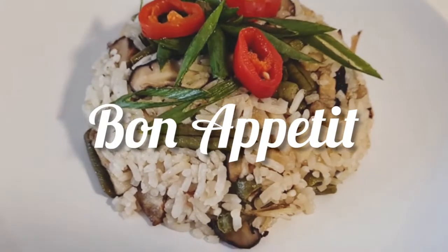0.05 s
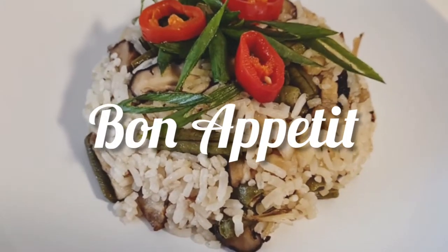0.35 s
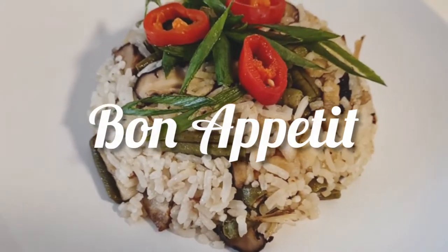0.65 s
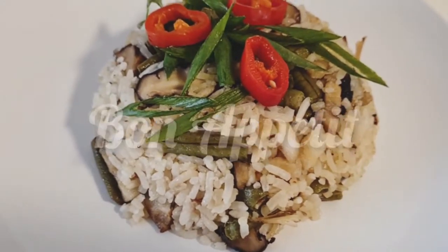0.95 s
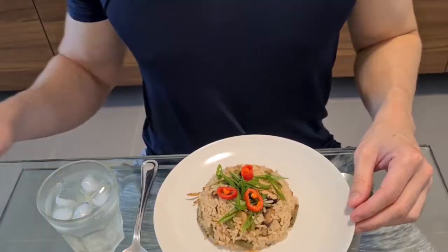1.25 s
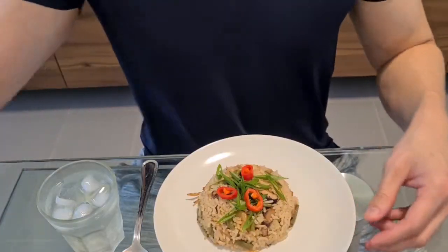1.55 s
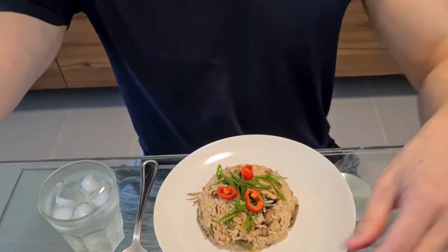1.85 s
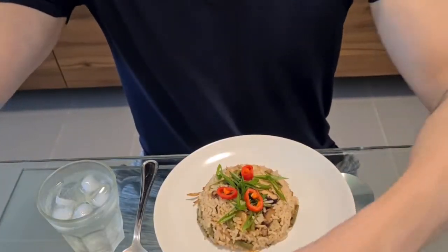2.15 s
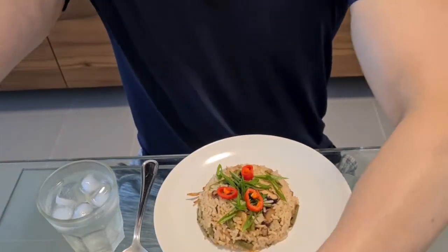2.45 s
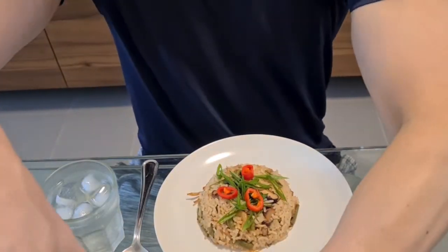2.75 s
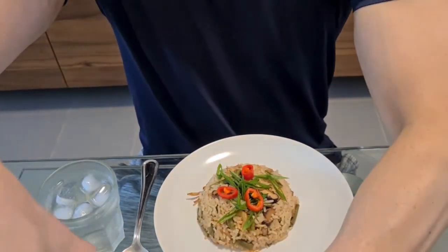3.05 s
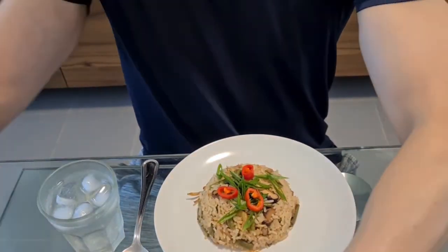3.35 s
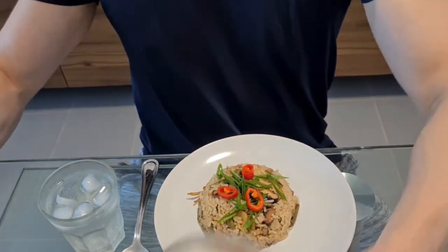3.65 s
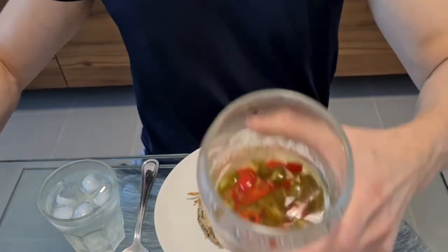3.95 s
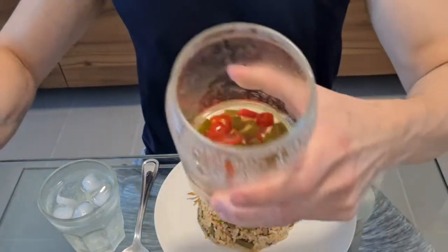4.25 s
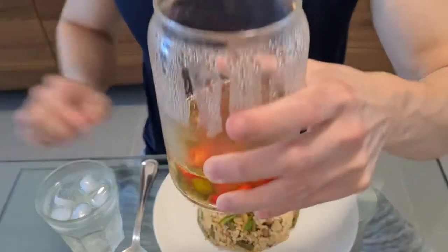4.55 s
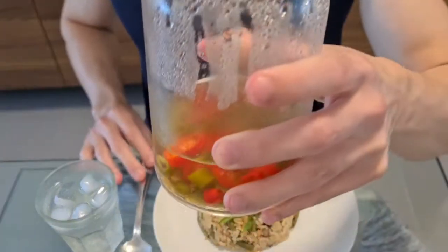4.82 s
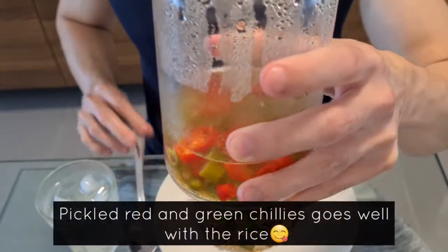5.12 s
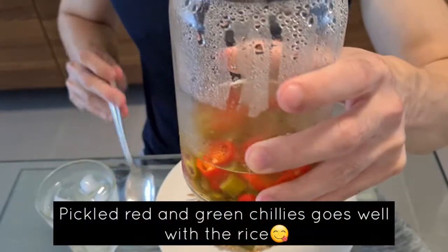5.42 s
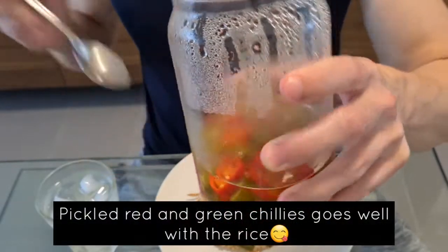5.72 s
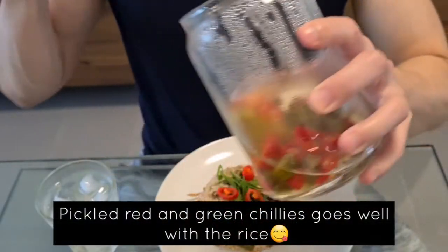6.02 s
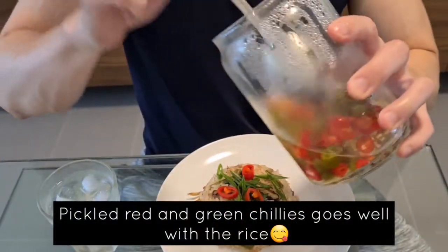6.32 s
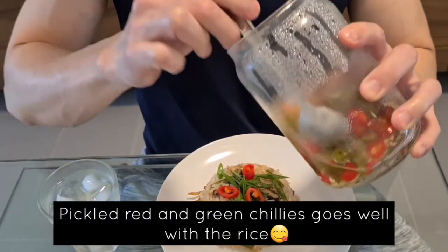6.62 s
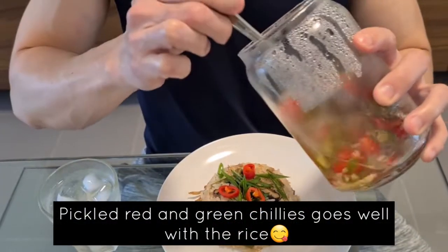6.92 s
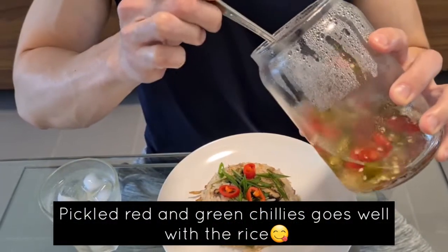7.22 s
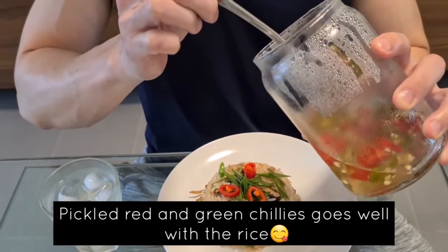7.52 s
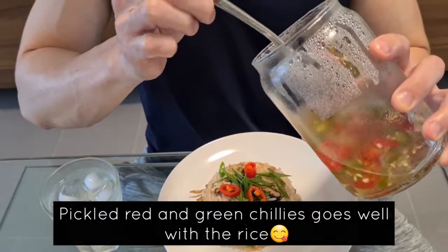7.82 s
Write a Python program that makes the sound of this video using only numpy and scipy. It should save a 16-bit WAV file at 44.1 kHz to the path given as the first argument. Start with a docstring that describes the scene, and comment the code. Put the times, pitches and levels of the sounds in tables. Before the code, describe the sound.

For the first second, quiet ventilation blows with a low hum. It cuts abruptly to a fridge in a small, hard-walled kitchen: compressor hum, rushing air and a thin pipe whistle that swells toward 3.3 seconds and dies away after 4. At about 1.9 and 2.0 seconds a glass jar knocks twice on a glass table, the loudest sounds here, and the top rings briefly. The jar clicks hollowly in the hand at 3.0 seconds, with a soft table thump, and again near 3.8 and 4.1. Around 5.0 seconds a steel spoon taps the glass top, then gives a brighter, ringing clink at 5.1. From 5.4 seconds the fridge's rush and hum sink away, leaving a low room rumble. Very faint scrapes and squeaks of the spoon stirring in the jar come around 6.4 to 6.7 seconds and just before 8.

```python
"""A glass dining table in a small, hard-walled kitchen. A second of quiet ventilation cuts to a fridge:
compressor hum, rushing air, a whistling pipe. Near 2 s a glass jar knocks twice and rings the table top;
from 3 s it clicks in the hand. Near 5 s a steel spoon, picked up, taps and clinks on the glass top.
From 5.4 s the fridge's rush and hum sink away, and the spoon stirs softly in the jar of pickled
chillies, sticking and slipping."""
import sys
import numpy as np
from scipy import signal
from scipy.fft import rfft, irfft, next_fast_len
from scipy.io import wavfile
from scipy.ndimage import uniform_filter1d, map_coordinates

SR = 44100
rng = np.random.default_rng(int(sys.argv[2]) if len(sys.argv) > 2 else 0)


def persist_wave(psi):
    """Save psi, clipped to +-1, as 16-bit WAV."""
    counts = np.round(np.clip(psi, -1, 1) * 32767).astype(np.int16)
    wavfile.write(sys.argv[1], SR, np.atleast_2d(counts).T)


N = 351918
TIME_S = np.arange(N) / SR
AGE_S = TIME_S[:SR * 3 // 4]  # time since a contact
LEAD_SAMPLES = SR // 100

# Table levels are relative; each source adds its own gain.
# jar on table: t/s, level/dB, pane/dB, brightness/dB, hollow/dB, room/dB, left lag/ms
JAR_KNOCKS = [(1.865, -50, -22, -12, -18, 15, 0), (1.898, -15.5, -19, -3.5, 1.5, -3, 0.42),
              (2.0364, -12.7, -16.5, 1.5, -4, -2.2, -0.096)]
# jar in hand: t/s, level/dB, hollow f/Hz, hollow/dB, ring/dB, rim/dB, brightness/dB, edge/dB, L-R/dB
JAR_CLICKS = [(3.0066, -31, 1720, -3, -12, 18, 6, -15, 4), (3.048, -41.5, 1700, -10, -7, 4, 4, -12, 1),
              (3.764, -25, 1684, -0.5, -13, 1, -1.5, 3, 3.5), (4.117, -30.5, 1835, 2.5, 1, 8, 2.5, 11, 5.5),
              (4.1275, -40, 1810, 3, 16, -7, -5, 4.5, 3.5)]
# spoon contacts: t/s, scrape/dB, brightness/dB, glass/dB, steel/dB
SPOON_CONTACTS = [(4.962, -48.5, 8, -51.5, -61.5), (4.971, -31, -2.5, -28.5, -51.5),
                  (5.124, -34, 6.5, -51, -36), (5.127, -21.5, 2.5, -28, -18)]
# spoon strokes in the jar: t/s, half-length/s, f/Hz, width/Hz, level/dB
STIR_STROKES = [(5.453, 0.02, 7670, 400, -65), (6.448, 0.05, 3260, 260, -70), (6.69, 0.036, 6110, 220, -76),
                (6.664, 0.016, 12240, 600, -80), (6.69, 0.045, 7500, 4500, -79),
                (6.72, 0.024, 12240, 600, -81), (7.948, .06, 11300, 1204, -79)]
# contact spectra: f/Hz, level/dB
KNOCK_SPECTRUM = [(47, -46), (80, -2.5), (133, -22.5), (346, -17), (504, -16.5), (575, -9), (1200, -3),
                  (1430, -5), (1900, -6), (2720, -8), (3170, -10.5), (4050, -22), (11200, -50.5),
                  (14300, -60), (16000, -71)]
CLICK_SPECTRUM = [(150, -12.5), (600, -7), (1200, 2), (1750, 5), (2250, -13.5), (3500, -9), (4300, -11.5),
                  (5500, -7), (8000, -17.5), (14000, -21.5), (16000, -28.5)]
SCRAPE_SPECTRUM = [(200, -31), (400, -22.5), (550, -7.5), (800, -6.5), (1200, -3), (1600, 4), (2050, 3.5),
                   (2400, -10), (2950, -1.5), (3700, -8.5), (5000, -14.5), (6200, -17), (9000, -26),
                   (14000, -42), (16000, -58.5)]
# modes of jar, table and spoon: f/Hz, level/dB, t60/s
JAR_MODES = [(1700, -5, 0.023), (1835, 3, 0.024), (4000, -26, 0.017), (5330, -16.5, 0.042),
             (6070, -30, 0.031), (8300, -20, 0.03), (11600, -14, 0.034), (14150, -17, .03)]
TABLE_MODES = [(68, 8, 0.11), (122, 8.5, 0.092), (390, -0.5, 0.037)]
SPOON_MODES = [(1615, -13, .2), (1990, -7, .15), (3994, -2, .39), (4080, 0, .05), (4204, -11, .17),
               (5240, 3, .04), (5311, -6, .38), (5390, -12, .2), (6724, -5.5, .34), (7488, -17, .3),
               (8264, -10.5, .3), (8726, -17, .2), (9991, -5.5, .31), (11810, -14.5, .28),
               (13300, -23, .07), (13790, -20, .28)]
# glass top struck by the jar: f/Hz, level/dB, t60/s
PANE_MODES = [(517.3, -9, 0.25), (640, -8, 0.22), (769, -10, .18), (985, -1, 0.29), (1110, 0.5, 0.18),
              (1193, -.5, .24), (1414, -2.5, 0.19), (1556, 0, .14), (1720, -3, 0.13), (1866, -5, 0.13),
              (2067, -8, 0.13), (2520, -7, 0.1), (3060, -8, 0.12), (3790, -12, 0.15)]
# glass top struck by the spoon: f/Hz, level/dB, t60/s
GLASS_TOP_MODES = [(1594, 1.5, 0.19), (1830, -5.5, 0.17), (2230, -2, 0.09), (2830, -7, 0.082),
                   (3200, -8.5, 0.14), (3840, -3.5, 0.12), (4840, -8, .07)]
# strength of the fridge's rush: t/s, level/dB
RUSH_LEVELS = [(1.07, -51.5), (1.3, -49.5), (2.9, -49), (4.05, -48.5), (4.45, -53), (4.8, -53.5),
               (5.0, -51), (5.4, -51.5), (5.9, -60.5), (6.25, -66), (7.75, -71), (7.98, -63.5)]
# strong compressor orders: multiple of shaft speed, level/dB
STRONG_ORDERS = [(1, -9), (2, 1), (3, 1), (4, -9), (8, 0), (9, -4.5), (10, -6.5), (11, -4.5), (13, -5),
                 (16, -7), (17, -5.5), (21, -11), (22, -14.5), (26, -6.5), (27, -7), (28, -7.5), (32, -6)]
# envelope of the other orders: f/Hz, level/dB
WEAK_ORDER_SPECTRUM = [(250, -16), (550, -11), (1300, -11.5), (1700, -13), (2100, -24), (2550, -15),
                       (3000, -22)]
# noise spectra of fridge, room and ventilation: f/Hz, level/dB
RUSH_SPECTRUM = [(150, -36), (250, -10.5), (346, -14), (380, -8), (520, -12), (700, -9.5), (950, -11.5),
                 (1270, -7), (1650, -7), (2150, -12.5), (2540, -13), (3300, -18), (4000, -24), (5200, -43),
                 (8800, -120)]
HISS_SPECTRUM = [(2060, -18.5), (3500, -10), (3900, -5.5), (4600, -4), (7410, -10.5), (9320, -13),
                 (10500, -9), (11900, -9.5), (15000, -26.5), (16000, -48.5)]
RUMBLE_SPECTRUM = [(12, -39.5), (20, -7), (158, -3), (210, -13), (241, -12.5), (293, -12.5), (328, -16),
                   (357, -17.5), (485, -16), (527, -21.5), (607, -16.5), (1090, -29.5), (3250, -38.5),
                   (4300, -40.5), (10000, -58), (16000, -62.5)]
VENT_SPECTRUM = [(12, -30), (20, 2), (37, -1), (80, -8.5), (128, -7), (174, -8.5), (328, -6), (1420, -7.5),
                 (2040, -5), (2770, -15.5), (5850, -26.5), (7720, -24), (9370, -36), (12000, -36),
                 (15000, -54)]
# resonances of the pipe and the electrical whine: f/Hz, width/Hz, level/dB
PIPE_BANDS = [(2555, 230, 1), (2950, 440, -5.5)]
WHINE_BANDS = [(3000, 500, -80.5), (5160, 100, -88.5), (9600, 660, -87.5), (11070, 40, -97.5)]
# hum lines: f/Hz, level/dB
MAINS_LINES = [(118.4, -66), (236.9, -66.5), (355.3, -71)]
VENT_LINES = [(123.8, -62.5), (608.3, -66)]
# ventilation whistles: f/Hz, width/Hz, level/dB, growth/(dB/s)
VENT_BANDS = [(2030, 130, -60.5, 4), (2860, 450, -65.5, -9), (3770, 400, -72.5, -4), (7150, 780, -72.5, -4),
              (7700, 300, -82, 9), (11860, 1200, -79, 5)]
# reverberation of the walls: f/Hz, t60/s
WALL_DECAY = [(150, 0.34), (600, 0.65), (1500, 0.39), (3000, .38), (6000, .3), (14000, 0.19)]
# diffuse field: f/Hz, left-right correlation
COHERENCE = [(60, 0.96), (130, 0.99), (300, 0.79), (430, 0.82), (640, 0.19), (1350, -0.25), (3000, 0.039),
             (12000, -0.087)]


def jar_knocks(rebound_s=0.0033, rebound_db=-4.5, hollow_hz=1694):
    """A light touch and two knocks: the jar lands on one edge, then the other, ringing the glass top."""
    out = np.zeros((2, N))
    for s, db, pane_db, bright_db, hollow_db, room_db, lag_ms in JAR_KNOCKS:
        for delay_s, edge_db in [(0, 0), (rebound_s, rebound_db)]:
            colour = shelf(KNOCK_SPECTRUM, 1360, bright_db)
            knock = shaped(chatter(t60_s=0.011, attack_s=0.00058), colour)
            hollow = amp(hollow_db - 7.5) * pock(hollow_hz)
            pane = amp(pane_db - 4) * ring(PANE_MODES, attack_s=0.0065, blur_hz=19.7)
            landing = in_room(knock + hollow + pane, room_db, lag_ms=lag_ms)
            add(out, s + delay_s, amp(db + edge_db + 9) * landing)
        snap = shaped(chatter(t60_s=0.018, attack_s=0.0018), CLICK_SPECTRUM)  # glass meets glass
        add(out, s, amp(db - 12) * in_room(snap, room_db=-11))
        add(out, s, amp(db - 31) * table_thump())
    return out


def jar_handling(nudge_s=3.052):
    """The jar clicks hollowly and rings in the hand; the table is nudged once."""
    out = np.zeros((2, N))
    for s, db, hollow_hz, hollow_db, ring_db, rim_db, bright_db, edge_db, pan_db in JAR_CLICKS:
        colour = shelf(shelf(CLICK_SPECTRUM, 2300, bright_db), 6000, edge_db)
        click = shaped(chatter(t60_s=0.012, attack_s=0.0011), colour)
        modes = [(hz, mode_db + (hz > 3000) * rim_db + (hz > 7000) * min(edge_db, 0), t60_s)
                 for hz, mode_db, t60_s in JAR_MODES]
        hollow = amp(hollow_db - 4) * pock(hollow_hz)
        glass = amp(ring_db - 11.5) * ring(modes, attack_s=0.0014, blur_hz=12)
        add(out, s, amp(db + 14) * in_room(click, room_db=0, pan_db=pan_db, lag_ms=-0.23))
        add(out, s, amp(db + 13) * in_room(hollow + glass, room_db=-2, pan_db=pan_db, lag_ms=-0.23))
    add(out, nudge_s, amp(-35) * table_thump())
    return out


def pock(hz, rise_s=0.0014):
    """The jar's hollow answer to a tap: a few cycles that swell and stop."""
    rise = AGE_S / rise_s
    return rise ** 2 * np.exp(2 * (1 - rise)) * np.sin(2 * np.pi * hz * AGE_S)


def table_thump():
    """The table shudders in its low modes."""
    return in_room(ring(TABLE_MODES, attack_s=0.0048), room_db=-24)


def spoon_clinks():
    """Each contact scrapes and rings the glass top; the steel buzzes on the glass, then rings freely."""
    out = np.zeros((2, N))
    for s, scrape_db, bright_db, glass_db, steel_db in SPOON_CONTACTS:
        colour = shelf(SCRAPE_SPECTRUM, 5000, bright_db)
        scrape = amp(scrape_db + 14) * shaped(chatter(t60_s=0.025, attack_s=0.0027), colour)
        glass = amp(glass_db - 8) * ring(GLASS_TOP_MODES, attack_s=0.0021, blur_hz=25.3)
        buzz = amp(15.5) * fade(AGE_S, t60_s=0.045) * ring(SPOON_MODES, attack_s=0.002, blur_hz=91)
        steel = amp(steel_db - 13) * (buzz + ring(SPOON_MODES, attack_s=0.0028, blur_hz=28))
        add(out, s, in_room(scrape + glass, room_db=0.5, lag_ms=0.42))
        add(out, s, in_room(steel, room_db=-3, pan_db=-6, lag_ms=0.362))
    return out


def spoon_stirs(slip_db=3, slips_per_s=160):
    """Stick-slip in the jar: narrow bands squeak, wide ones scrape."""
    out = np.zeros((2, N))
    slips = unit(amp(slip_db * wobble(slips_per_s)))
    for s, half_length_s, hz, width_hz, db in STIR_STROKES:
        stroke = np.exp(-((TIME_S - s) / half_length_s) ** 2)
        out += amp(db) * stroke * slips * band(hz, width_hz)
    return out


def chatter(t60_s, attack_s):
    """A contact: a short noise burst with a flattened spectrum."""
    burst = rng.standard_normal(len(AGE_S)) * fade(AGE_S, t60_s) * (1 - np.exp(-AGE_S / attack_s))
    bins = rfft(burst)
    flat = irfft(bins / np.sqrt(uniform_filter1d(np.abs(bins) ** 2, size=96)), len(AGE_S))
    return flat * np.linalg.norm(burst) * (AGE_S < 0.5)


def ring(modes, attack_s, blur_hz=0):
    """Decaying modes of a struck object; a loose, moving grip blurs each pitch."""
    out = np.zeros(len(AGE_S))
    for hz, db, t60_s in modes:
        phase = 2 * np.pi * (hz * AGE_S + rng.random())
        drift = np.cumsum(rng.standard_normal(len(AGE_S))) * np.sqrt(blur_hz * 2 * np.pi / SR)
        out += amp(db) * fade(AGE_S, t60_s) * np.sin(phase + uniform_filter1d(drift, size=96))
    return out * (1 - np.exp(-AGE_S / attack_s))


def fridge_and_room(full_rush_db=-49):
    """Fridge over mains hum, whine and rumble. Hiss, compressor and, slightly, rumble follow the rush."""
    rush_db = np.interp(TIME_S, *np.transpose(RUSH_LEVELS))
    change_db = rush_db - full_rush_db
    hum = amp(-46.5 + change_db) * compressor()
    mains = sum(amp(db) * tone(hz, waver=0.15) for hz, db in MAINS_LINES)
    whine = sum(amp(db) * band(hz, width_hz) for hz, width_hz, db in WHINE_BANDS)
    rumble = amp(-49.5 + 0.15 * change_db + 1.84 * wobble(5)) * air(RUMBLE_SPECTRUM)
    hiss = amp(-59.5 + 1.38 * change_db) * air(HISS_SPECTRUM)
    whistle = pipe_whistle()
    flutter = amp(0.51 * wobble(17))
    rush = amp(rush_db + 2) * air(RUSH_SPECTRUM)
    return rumble + mains + whine + hum + flutter * (rush + hiss + whistle)


def compressor(shaft_hz=47.45, orders=62):
    """Multiples of the shaft speed hum, a few strongly; rms 1."""
    strong_db = {round(order): db for order, db in STRONG_ORDERS}
    hum = np.zeros((2, N))
    for order in range(1, orders + 1):
        hz = order * shaft_hz
        hum += amp(strong_db.get(order, along(WEAK_ORDER_SPECTRUM, hz))) * tone(hz, waver=0.24)
    return unit(hum)


def pipe_whistle(peak_s=3.3, hold_s=0.69, rise_db_per_s=4, fall_db_per_s=35, wander_hz=20):
    """Pipe resonances swell, surge briefly, hold and die away; the pitch strays."""
    pipe = sum(amp(db) * band(hz, width_hz) for hz, width_hz, db in PIPE_BANDS)
    early_s = np.maximum(peak_s - TIME_S, 0)
    late_s = np.maximum(TIME_S - peak_s - hold_s, 0)
    surge_db = 1.5 * np.exp(-((TIME_S - peak_s) / 0.09) ** 2)
    level_db = -52 + surge_db - rise_db_per_s * early_s - fall_db_per_s * late_s + 0.76 * wobble(10)
    drift = 2 * np.pi * np.cumsum(wander_hz * wobble(4)) / SR
    return amp(level_db) * np.real(signal.hilbert(pipe) * np.exp(1j * drift))


def ventilation(end_s):
    """Quiet airflow with a low hum and fluttering, whistling bands."""
    flow = amp(np.interp(TIME_S, [0, 0.55, 0.75, 1.05], [-49.5, -49, -51.5, -51.5])) * air(VENT_SPECTRUM)
    elapsed_s = np.minimum(TIME_S, end_s)
    whistle = sum(amp(db + db_per_s * elapsed_s + 2.6 * wobble(71)) * band(hz, width_hz)
                  for hz, width_hz, db, db_per_s in VENT_BANDS)
    hum = sum(amp(db) * tone(hz, waver=0.92) for hz, db in VENT_LINES)
    return (flow + hum) * amp([[-0.7], [0.7]]) + whistle * amp([[-3], [2]])


def in_room(x, room_db, pan_db=0, lag_ms=0):
    """Direct sound plus reflections from table top and walls, delayed by LEAD_SAMPLES."""
    hz, s, bins = signal.stft(rng.standard_normal((2, len(AGE_S))), SR, nperseg=256)
    decay = fade(s, along(WALL_DECAY, hz)[:, None])
    tail = signal.istft(bins * decay, SR, nperseg=256)[1][:, :len(AGE_S)]
    early_boost = 1 + fade(AGE_S, t60_s=0.1313)
    tail = spread(tail) * np.clip(AGE_S / 0.0028, 0, 1) * early_boost
    wet = signal.fftconvolve(x[None], tail / np.linalg.norm(tail[0]), axes=1)[:, :len(x)]
    side = np.array([[0.5], [-0.5]])
    lag_s = side * lag_ms / 1000
    direct = filtered(np.pad(x, (LEAD_SAMPLES, 0)), lambda hz: np.exp(-2j * np.pi * hz * lag_s))
    return direct * amp(side * pan_db) + amp(room_db) * np.pad(wet, ((0, 0), (LEAD_SAMPLES, 0)))


def air(spectrum):
    """Diffuse noise; rms 1."""
    return unit(filtered(spread(rng.standard_normal((2, N))), lambda hz: amp(along(spectrum, hz))))


def band(centre_hz, width_hz):
    """Noise in one resonance; rms 1."""
    noise = rng.standard_normal((2, N))
    return unit(filtered(noise, lambda hz: 1 / (1 + ((hz - centre_hz) / width_hz * 2) ** 2)))


def tone(hz, waver):
    """A wavering hum line, reaching each side in its own phase; rms 1."""
    offset = stereo_angle(hz) * rng.choice([-1, 1])
    phase = 2 * np.pi * (hz * TIME_S + rng.random()) + waver * wobble(2.98)
    return unit(np.sin([phase + offset, phase - offset]) * (1 + waver * wobble(4.4) / 2))


def spread(pair):
    """Two independent signals to a diffuse field: alike in the bass, unrelated in the treble."""
    mid, side = filtered(pair, lambda hz: np.array([np.cos(stereo_angle(hz)), np.sin(stereo_angle(hz))]))
    return np.array([mid + side, mid - side])


def stereo_angle(hz):
    """Mid-side angle/rad for the diffuse field's correlation."""
    return np.arccos(np.clip(along(COHERENCE, hz), -1, 1)) / 2


def shaped(x, spectrum, size=4096):
    """Minimum-phase filter of unit energy; keeps the attack."""
    cepstrum = irfft(np.log(amp(along(spectrum, np.fft.rfftfreq(size, 1 / SR)))))
    cepstrum[1:size // 2] *= 2
    cepstrum[size // 2 + 1:] = 0
    pulse = irfft(np.exp(rfft(cepstrum)))
    return signal.fftconvolve(x, pulse / np.linalg.norm(pulse))[:len(x)]


def shelf(spectrum, corner_hz, db):
    """Treble shelf, reaching db one octave above the corner."""
    return [(hz, level_db + db * np.clip(np.log2(hz / corner_hz), 0, 1)) for hz, level_db in spectrum]


def filtered(x, response):
    """Apply a frequency response."""
    size = next_fast_len(x.shape[-1] + SR // 4)
    return irfft(rfft(x, size) * response(np.fft.rfftfreq(size, 1 / SR)), size)[..., :x.shape[-1]]


def wobble(knots_per_s):
    """Smooth random curve."""
    knots = rng.standard_normal(int(N * knots_per_s / SR) + 4)
    return np.interp(TIME_S, TIME_S[::200], map_coordinates(knots, [TIME_S[::200] * knots_per_s]))


def along(points, hz):
    """Interpolate (f/Hz, value) points over log frequency."""
    knots_hz, values = np.transpose(points)
    return np.interp(np.log(hz + 1), np.log(knots_hz), values)


def fade(s, t60_s):
    """Exponential decay."""
    return amp(-60 * s / t60_s)


def amp(db):
    """Decibels to gain."""
    return 10 ** (np.asarray(db) / 20)


def unit(x):
    """Scale to rms 1."""
    return x / np.sqrt(np.mean(x ** 2) + 1e-20)


def add(out, s, sound):
    """Mix in an in_room sound, its blow at time s."""
    start = round(s * SR) - LEAD_SAMPLES
    out[:, start:start + sound.shape[1]] += sound[:, :N - start]


def scene(vent_end_s=1.047, fridge_start_s=1.061):
    """Ventilation, a blink of near silence, then jar and spoon over the fridge."""
    before = np.clip((vent_end_s - TIME_S) / 0.003, 0, 1)
    after = np.clip((TIME_S - fridge_start_s) / 0.0025, 0, 1)
    gap = 0.013 * (1 - before) * (1 - after)
    background = (before + gap) * ventilation(vent_end_s) + after * fridge_and_room()
    return background + jar_knocks() + jar_handling() + spoon_clinks() + spoon_stirs()


def record(dry, top_hz=15800):
    """Brick-wall low-pass."""
    return filtered(dry, lambda hz: hz < top_hz)


dry = scene()
out = record(dry)
persist_wave(out)
```